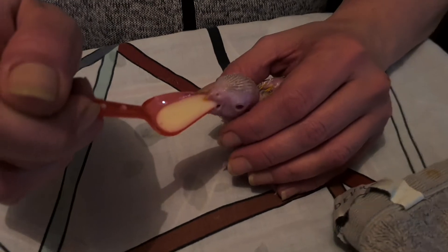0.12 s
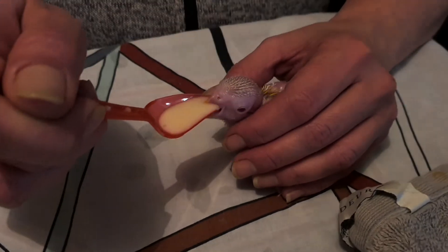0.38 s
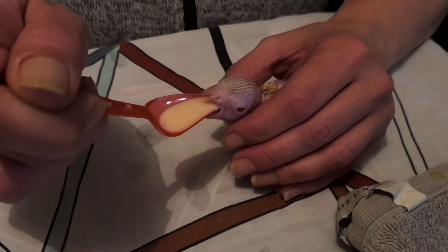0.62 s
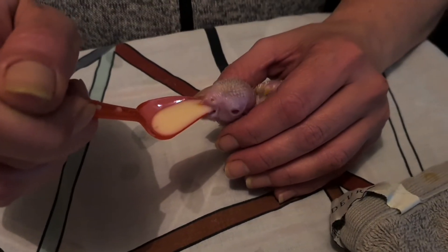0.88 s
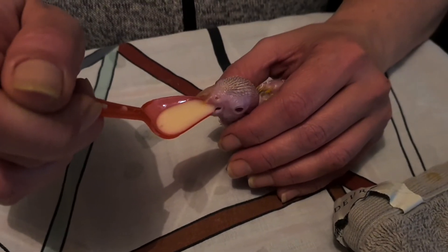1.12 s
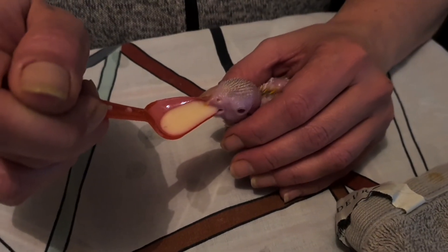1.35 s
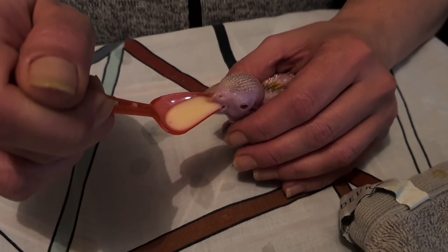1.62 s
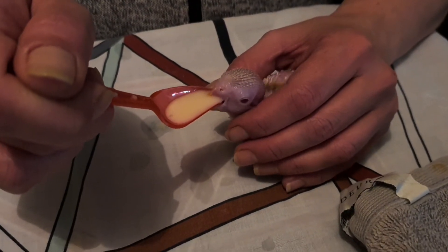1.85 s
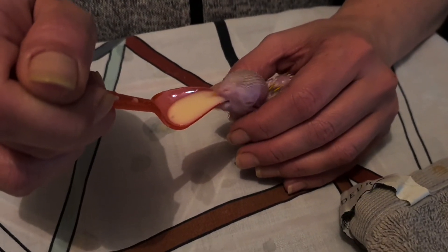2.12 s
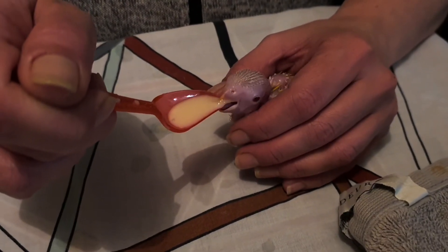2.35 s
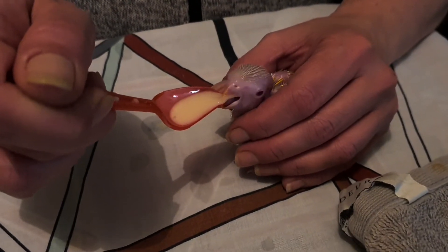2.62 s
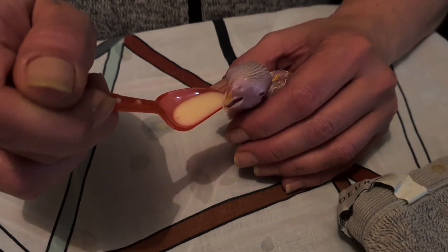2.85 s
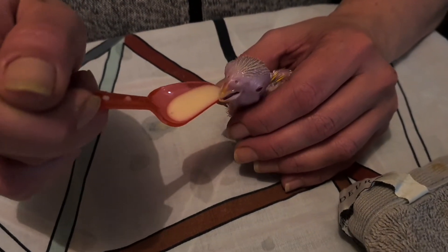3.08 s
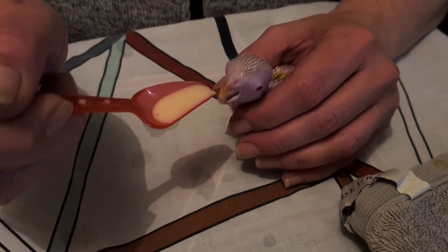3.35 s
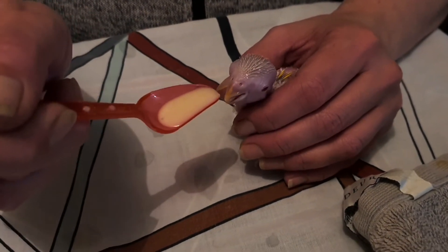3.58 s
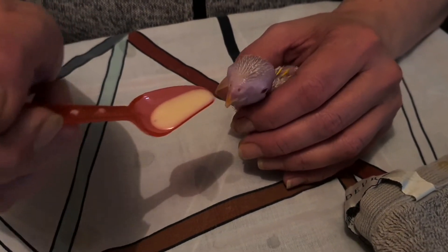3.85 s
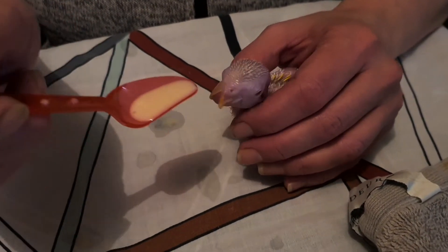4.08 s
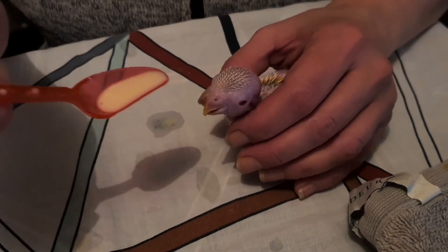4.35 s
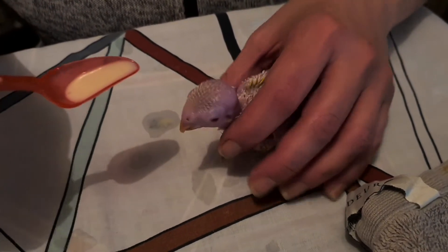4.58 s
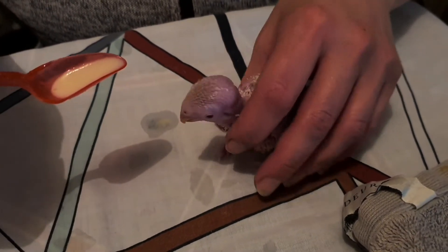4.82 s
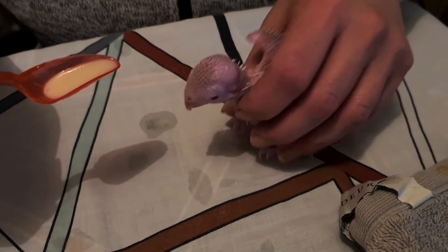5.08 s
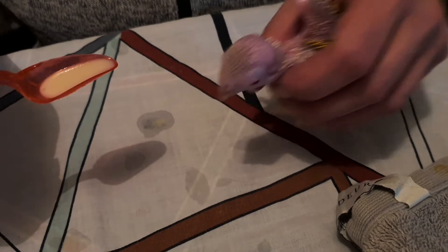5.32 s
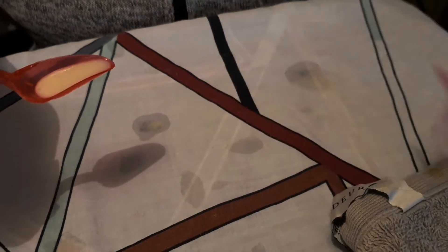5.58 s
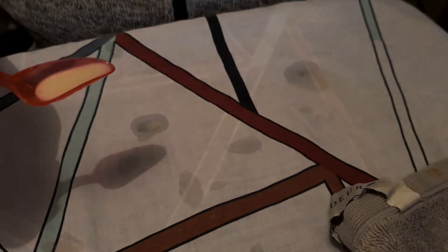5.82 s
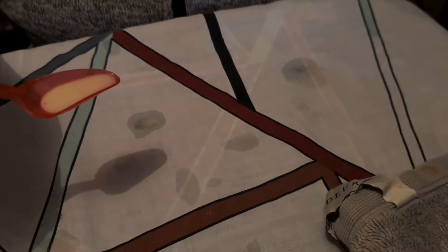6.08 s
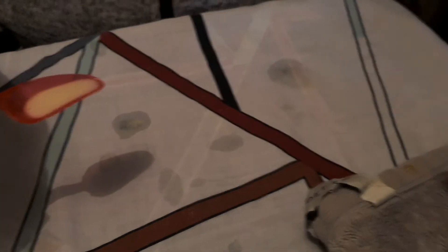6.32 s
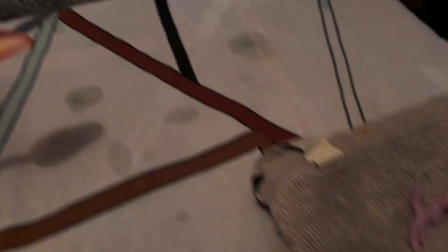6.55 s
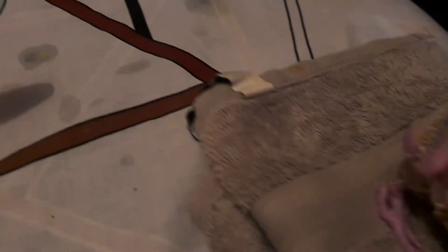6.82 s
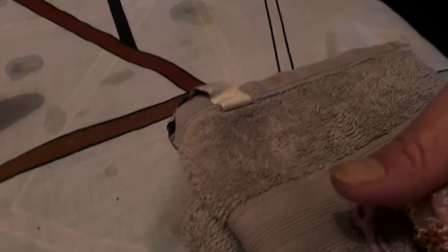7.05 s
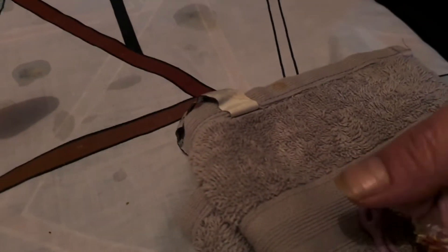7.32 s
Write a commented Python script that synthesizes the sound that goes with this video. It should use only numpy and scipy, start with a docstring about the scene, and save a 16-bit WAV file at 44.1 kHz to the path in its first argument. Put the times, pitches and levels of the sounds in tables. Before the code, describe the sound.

A close, dry stereo take in a quiet room with barely audible air noise, hum and hiss. From 0.2 to 1.9 seconds, rounded hollow table thumps come irregularly, several per second, over a patter of small bumps, grainy cloth brushes and tiny bright beak ticks on a spoon. Crisper ticks fall around 2.1. At 2.3 a parrot chick gives a short harsh squawk, moderately loud, fading with a tiny falling whistle. Light ticks and faint bumps follow, then strong thumps at 3.7, 3.8, 4.2 and 4.6. Louder raspy squawks, about 0.4 seconds each, start at 3.9, ending in a thin whistle, and at 4.75. A bright one at 5.5 droops sharply; a longer, rougher one runs 6.25 to 6.75, further right. Soft rustling and a tick precede the last sharp squawk at 7.3, which runs up to the end.

```python
"""Squawking parrot chick

A parrot chick squawks six times on a cloth-covered table in a quiet room, close to a pair of microphones.
Its voice is a half-chaotic membrane driving throat resonances that follow the beak. Its bobbing and the
feeding hands excite the damped modes of the hollow table; the beak on the spoon gives ringing cracks,
and brushed cloth gives grainy noise. Coloured air noise, a faint hum and hiss lie beneath."""
import sys
import numpy as np
from scipy import signal
from scipy.fft import rfft, irfft, next_fast_len
from scipy.io import wavfile
from scipy.ndimage import uniform_filter1d

SR = 44100
rng = np.random.default_rng(int(sys.argv[2]) if len(sys.argv) > 2 else 0)


def convert_level_to_amplitude(level_db):
    """Map a level in decibels to its linear amplitude factor."""
    exponent = np.asarray(level_db, float) / 20
    return 10 ** exponent


def inscribe(sig):
    """Save sig as 16-bit PCM at rate SR to the path in sys.argv[1].

    A 1-D sig is mono; a 2-D sig holds one channel per row.
    Samples are clipped to [-1, 1] before scaling.
    """
    pcm = np.round(np.clip(np.atleast_2d(sig).T, -1, 1) * 32767)
    wavfile.write(sys.argv[1], SR, pcm.astype(np.int16))


N = 327648  # length in samples

# Noise of the still air: [f/Hz, relative density level/dB per Hz]
AIR_SPECTRUM = [(15, -37.5), (25, -8.5), (102, -7.5), (127, -13), (190, -21.5), (270, -18.5), (326, -24),
                (476, -12), (714, -31), (887, -25.5), (1740, -22.5), (4870, -35.5), (16000, -48.5)]
# Likeness of the air noise at left and right: [f/Hz, correlation, clipped to -1..1]
AIR_LIKENESS = [(60, -0.084), (640, 0.5), (1400, -1.3), (15000, 1)]
AIR_DB, SELF_NOISE_DB = -69.5, -83.5  # rms of the air noise and of the microphones' own hiss
HUM_HZ, HUM_DB = 101, -73.5  # level of the peak

# Thumps on the table: [t/s, peak level of the ring/dB, gain of modes below 160 Hz/dB,
# peak level of the slap relative to the ring/dB]
THUMPS = [(0.153, -49, -25, -13), (0.208, -29, -23, -21), (0.453, -25, -20, -16.5), (0.792, -22, -19, -28),
          (0.91, -48, -16, -8), (1.071, -20.5, -20.5, -20.5), (1.213, -20.5, -21.5, -22),
          (1.339, -20, -20, -37), (1.469, -43.5, -28, -26), (1.536, -23.5, -21, -25.5),
          (1.74, -32.5, -15, -33), (1.902, -24, -13.5, -28.5), (2.471, -43, -20, -3),
          (2.509, -38.5, -23, -7), (2.983, -53, -10, -26), (3.022, -41, -23, -11.5),
          (3.223, -51.5, -35, -23), (3.447, -55.5, -36, -9), (3.603, -47, -23, -16),
          (3.655, -17, -22.5, -17.5), (3.839, -17, -18.5, -21), (4.223, -17.5, -23, -26.5),
          (4.558, -15.5, -24.5, -29), (6.933, -49, -18, -27.5), (7.258, -45, -19.5, -23.5)]
# Modes of the hollow table: [f/Hz, relative level/dB, t60/s]
TABLE_MODES = [(56.5, 7.5, 0.23), (159.09, 6, 0.12), (240, -4.5, 0.07), (276.5, 0.5, 0.11),
               (333.6, -1.5, 0.085), (436, -7.5, 0.097), (507, -16, 0.11), (635, -21.5, 0.13)]
# Envelope of the small bumps of hands on the table: [t/s, level/dB]
JOSTLE = [(0.0, -100), (0.14, -67), (0.33, -57.5), (0.72, -58.5), (1.71, -58), (2.23, -66.5), (2.5, -60.5),
          (2.69, -66), (3.02, -75.5), (3.2, -61.5), (3.4, -78.5), (3.62, -66.5), (3.79, -50), (3.95, -68),
          (4.88, -64), (5.2, -84.5), (6.21, -90), (7.06, -81.5), (7.43, -69)]

# Skin and down brushing the cloth: [centre t/s, level before graining/dB, half length to 1/e of peak/s]
RUSTLES = [(0.187, -75, 0.12), (0.41, -70, 0.041), (0.749, -64.5, 0.015), (.92, -60.5, 0.014),
           (1.201, -65, 0.017), (1.37, -73, 0.058), (1.475, -68.5, 0.016), (1.577, -70, 0.029),
           (1.636, -62, 0.012), (1.686, -60.5, 0.0055), (1.776, -67.5, 0.027), (2.085, -70, 0.0014),
           (3.034, -64, 0.023), (3.242, -80, 0.016), (3.66, -79.5, 0.09), (3.793, -60, 0.015),
           (6.06, -65, 0.005), (6.081, -64.5, 0.0056), (6.897, -65, 0.14), (7.311, -60, 0.025)]
# Noise of the cloth: [f/Hz, relative density level/dB per Hz]
CLOTH_SPECTRUM = [(500, 1.5), (1000, 0), (2200, -1.5), (3500, -11.5), (7000, -10), (9500, -19.5),
                  (13000, -10), (16000, -18)]

# Beak on the spoon: [t/s, peak level/dB, centre f/Hz]
TICKS = [(0.6823, -46.5, 6560), (0.7158, -53, 5030), (0.831, -44.5, 7000), (1.1137, -46, 6570),
         (1.4034, -48.5, 4700), (1.5064, -49, 6150), (1.648, -41, 4970), (1.7848, -48, 4520),
         (1.833, -52, 4570), (1.881, -48, 5670), (2.0849, -38.5, 6900), (2.155, -54, 5860),
         (2.2064, -40.5, 6300), (3.021, -40, 6500), (3.289, -54, 5880), (3.4394, -57.5, 5750),
         (3.5192, -45.5, 7550), (3.7814, -61.5, 5440), (4.4624, -45, 8080), (5.2823, -47, 5630),
         (6.926, -65, 7120), (7.1761, -47.5, 7110)]

# Course of each squawk: [start t/s, length/s, burst level/dB, held level/dB, drift/dB per s, settling/s]
SQUAWKS = [(2.336, .266, -28, -37.5, -42.5, 0.035), (3.915, .43, -18, -35.5, -29.5, .03),
           (4.753, 0.43, -20.5, -37, 5, .03), (5.519, 0.31, -15.5, -27, -21, .035),
           (6.25, 0.51, -17.5, -29.5, -2, .045), (7.312, .2, -13.5, -28.5, 0, 0.032)]
# Pitch of each squawk: [first f/Hz, held f/Hz, last f/Hz, held roughness 0-1, last roughness 0-1]
VOICES = [(1277, 1470, 1720, .6, .3), (940, 1610, 1570, .7, 0.65), (1173, 1750, 1690, .55, .5),
          (1410, 1780, 1730, 0.55, 0.43), (951.3, 1740, 1630, 0.74, 0.79), (1471, 1690, 1650, .7, .6)]
# Colour of each squawk: [low-voice level/dB, the same in the burst/dB, brightness/dB per octave,
# droop of the pitch at the end/Hz, dark band f/Hz]
COLOURS = [(1.5, -12.5, -1, 10, 4000), (-4.5, -15, -3, 10, 4350), (1, -6, 6, 430, 4330),
           (0, -2, 5.5, 700, 2600), (-1.5, -13.5, 6, 100, 2720), (-2, -9.5, 3, 10, 2700)]
# Lower edge of what the throat passes in each squawk: [f/Hz]
THROAT_FLOORS_HZ = [750, 800, 748, 1190, 720, 740]
# Place of each squawk: [lag of left behind right/ms, left minus right level/dB, beak-opening factor]
PLACES = [(-.11, 5, 0.918), (-0.12, 5, 1.01), (-.135, 4.5, 1.01), (0.19, 2, 1.1), (0.176, -3, 1.01),
          (.11, -3, 1.2)]
# Resonances of throat and beak before the beak moves them: [f/Hz, width of the first stage/Hz, level/dB]
THROAT = [(1620, 1400, -22), (3560, 2020, 1), (5880, 1500, 8), (7170, 710, 2.5), (9600, 1100, -4),
          (11574, 2800, -16)]
# Breaks into a clear falling whistle: [t/s, length/s, from f/Hz, to f/Hz, starting level/dB,
# lateness of the fall (exponent)]
WHISTLES = [(2.573, 0.023, 2980, 2497, -44.5, .8), (4.245, 0.033, 3100, 2890, -48.5, .3),
            (4.279, .064, 5150, 2200, -53.5, 4)]
WHISTLE_ROUGH, WHISTLE_LOW_DB, WHISTLE_BRIGHT_DB = .08, 9, -1  # the last in dB per octave
WHISTLE_SWELL_DB = 4.5  # a whistle grows as it falls
# Pitch climbs to a top, sinks and drifts, and droops at the end
TOP_HZ, CLIMB_S, SETTLE_S, DROOP_S = 1952, .023, .035, 0.038
# Roughness rises during the climb, rises on to its held value, then drifts
FIRST_ROUGH, CLIMBED_ROUGH = .2, .42
# Loudness snaps in and swells to the burst
ATTACK_S, SWELL_S, SWELL_DB, BURST_S = .008, .014, -8, 0.025
FADE_S, FADE_DB, RELEASE_S, QUIET_DB = 0.092, -7, 0.006, -24
FIRST_LOW_DB, LAST_LOW_DB, FIRST_BRIGHT_DB = 5, 6, -10  # dull start and end; the last in dB per octave
DARK_WIDTH_HZ, DARK_DEPTH = 300, 0.71  # depth is the fraction of the band taken away
BEAK_WOBBLE, BEAK_SHUT = 0.018, 0.63  # the beak drifts a little and closes as the pitch droops

# Decay of the room: [f/Hz, t60/s]
ROOM_DECAY = [(250, .2), (2000, 0.17), (6000, 0.15), (14000, 0.064)]


def evened(x):
    """Normalisation: scales to rms 1."""
    return x / np.sqrt(np.mean(x ** 2) + 1e-20)


def read(points, hz):
    """Interpolation: reads a curve on a log-frequency axis."""
    f, value = np.transpose(points)
    return np.interp(np.log(hz + 1), np.log(f + 1), value)


def add(mix, s, sound):
    """Superposition: mixes a sound in at time s."""
    part = mix[..., round(s * SR):][..., :sound.shape[-1]]
    part += sound[..., :part.shape[-1]]


def resonate(x, hz, width):
    """Heterodyning: shifts the curve hz to zero, smooths, and shifts back, a resonance of gain 1."""
    turn = np.exp(2j * np.pi * np.cumsum(hz * np.ones(len(x))) / SR)
    r = np.exp(-np.pi * width / SR)
    return 2 * (turn * signal.lfilter([1 - r], [1, -r], x / turn)).real


def placed(x, lag_ms, pan_db):
    """Two-microphone localisation: one source arrives at slightly different times and levels."""
    size = next_fast_len(len(x) + 64)
    side = np.array([[.5], [-.5]])  # left and right share each difference equally
    shift = np.exp(-2j * np.pi * np.fft.rfftfreq(size, 1 / SR) * side * lag_ms / 1000)
    return convert_level_to_amplitude(side * pan_db) * irfft(rfft(x, size) * shift, size)[:, :len(x)]


def hiss(colour, same, patchy_db):
    """Partly coherent noise: two channels with a spectrum, a likeness and drifting patches."""
    frames, hz = N // 256 + 5, np.fft.rfftfreq(1024, 1 / SR)
    a, b, c, d, patches = rng.standard_normal((frames, 513, 5)).T
    patches = uniform_filter1d(patches, size=14, axis=0)
    patches = evened(uniform_filter1d(patches, size=10, axis=1))
    same = np.clip(read(same, hz), -1, 1)[:, None]
    left = a + 1j * b
    right = same * left + np.sqrt(1 - same ** 2) * (c + 1j * d)
    z = np.array([left, right]) * convert_level_to_amplitude(read(colour, hz)[:, None] + patchy_db * patches)
    return evened(signal.istft(z, nperseg=1024, noverlap=768)[1][:, :N])


def hum():
    """Pure tone: a faint steady sine."""
    return convert_level_to_amplitude(HUM_DB) * np.sin(2 * np.pi * HUM_HZ * np.arange(N) / SR)


def self_noise():
    """Independent noise: each microphone hisses by itself in a broad treble band."""
    own = [evened(resonate(air, 12800, 3000)) for air in rng.standard_normal((N, 2)).T]
    return convert_level_to_amplitude(SELF_NOISE_DB) * np.array(own)


def knock(boom_db, slap_db, push_s, luck, air):
    """Modal excitation: a soft push rings the table; a dull slap follows a few ms later."""
    t = np.arange(len(air)) / SR
    ring = 0
    for (hz, db, t60), u in zip(TABLE_MODES, luck):
        mode_db = db + (hz < 160) * boom_db + u - 60 * t / t60
        ring = ring - convert_level_to_amplitude(mode_db) * np.sin(2 * np.pi * hz * t + 0.45 * u)
    soft_start = 1 - np.exp(-(t / push_s) ** 2)
    ring = ring * soft_start * (1 + 2.5 * np.exp(-(t / .010) ** 2))
    late = np.maximum(t - .005, 0)
    burst = (late > 0) * (np.exp(-late / .004) + .55 * np.exp(-late / .02)) * air
    slap = resonate(burst, 860, 400) + .8 * resonate(burst, 1260, 450) + .35 * resonate(burst, 2110, 900)
    slap = signal.sosfilt(signal.butter(3, [600, 2900], "band", fs=SR, output="sos"), slap)
    return ring / abs(ring).max() + convert_level_to_amplitude(slap_db) * slap / abs(slap).max()


def table():
    """Linear superposition: listed thumps over a random patter of bumps; the deepest boom leans left."""
    out = np.zeros(N)
    luck = rng.standard_normal((len(THUMPS) + 4, len(TABLE_MODES) + 12000))
    for (s, db, boom_db, slap_db), row in zip(THUMPS, luck):
        add(out, s + .001, convert_level_to_amplitude(db) * knock(boom_db, slap_db, .0035, row, row[len(TABLE_MODES):]))
    heights = convert_level_to_amplitude(3.8 * np.minimum(rng.exponential(1, N), 4))
    happens = rng.random(N) < 130 / SR  # 130 bumps per second on average
    bumps = heights * happens * rng.choice([-1, 1], N)
    kind = rng.integers(0, 4, N)  # four different knocks take turns at random
    patter = 0
    for k, row in enumerate(luck[-4:]):
        bump = knock(-14.5, -14, 0.0073, 2 * row, row[len(TABLE_MODES):])
        patter = patter + signal.oaconvolve(bumps * (kind == k), bump)[:N]
    out += convert_level_to_amplitude(np.interp(np.arange(N) / SR, *np.transpose(JOSTLE))) * evened(patter)
    boom = signal.sosfilt(signal.butter(2, 90, fs=SR, output="sos"), out)
    near_left = placed(out, -0.11, 1.8)
    return near_left + .3 * np.array([boom, -boom])


def cloth():
    """Friction noise: short brushes whose level flickers in fine grains."""
    t = np.arange(N) / SR
    stroke = sum(convert_level_to_amplitude(db) * np.exp(-((t - s) / half) ** 2) for s, db, half in RUSTLES)
    grain = convert_level_to_amplitude(4 * evened(uniform_filter1d(rng.standard_normal(N), size=90)))
    return stroke * grain * hiss(CLOTH_SPECTRUM, [(500, 0.83), (3000, 0.44)], 2.3)


def ticks():
    """Impact: each tick is a crack with a very short ring and a puff of tail."""
    out, t = np.zeros(N), np.arange(900) / SR
    for (s, db, hz), air in zip(TICKS, rng.standard_normal((len(TICKS), 900))):
        crack = air * (np.exp(-t / .0004) + .06 * np.exp(-t / .004))
        tick = resonate(crack, hz, 1800) + 1.7 * resonate(crack, 2300, 800) + 0.29 * crack
        add(out, s, convert_level_to_amplitude(db) * tick / abs(tick).max())
    return placed(out, -0.12, 0.98)


def gesture(start, length, burst_db, held_db, drift_db, settle_s, first_hz, held_hz, last_hz, held_rough,
            last_rough, low_db, burst_low_db, bright_db, droop_hz):
    """Control of phonation: effort, pitch, roughness and colour over one squawk."""
    t = np.arange(0, length, 1 / SR)
    left = length - t
    snap, ending = np.exp(-t / SWELL_S), np.clip(1 - left / FADE_S, 0, 1)
    burst = np.exp(-(np.maximum(t - BURST_S, 0) / settle_s) ** 2.1)
    effort_db = held_db + drift_db * t + (burst_db - held_db) * burst
    effort_db = effort_db + SWELL_DB * snap + FADE_DB * ending
    climb = np.minimum(t / CLIMB_S, 1)
    settled = 1 - np.exp(-np.maximum(t - CLIMB_S, 0) / SETTLE_S)
    drifting_hz = held_hz + (last_hz - held_hz) * t / length
    hz = first_hz + (TOP_HZ - first_hz) * np.sin(climb * np.pi / 2) + (drifting_hz - TOP_HZ) * settled
    shut = droop_hz / last_hz * np.clip(1 - left / DROOP_S, 0, 1) ** 2.2
    hz = hz * (1 - shut)
    drifting_rough = held_rough + (last_rough - held_rough) * t / length
    rough = FIRST_ROUGH + (CLIMBED_ROUGH - FIRST_ROUGH) * climb
    rough = rough + (drifting_rough - CLIMBED_ROUGH) * settled
    low_db = low_db + (burst_low_db - low_db) * burst * climb
    low_db = low_db + FIRST_LOW_DB * snap + LAST_LOW_DB * ending
    bright_db = bright_db + FIRST_BRIGHT_DB * snap
    for s, span, from_hz, to_hz, db, late in WHISTLES:
        u = (start + t - s) / span
        on = (u >= 0) & (u < 1)
        hz = np.where(on, from_hz + (to_hz - from_hz) * abs(u) ** late, hz)
        rough = np.where(on, WHISTLE_ROUGH, rough)
        effort_db = np.where(on, db + WHISTLE_SWELL_DB * u, effort_db)
        low_db = np.where(on, WHISTLE_LOW_DB, low_db)
        bright_db = np.where(on, WHISTLE_BRIGHT_DB, bright_db)
    edges = np.clip(1 - t / ATTACK_S, 0, 1) ** .7 + np.clip(1 - left / RELEASE_S, 0, 1) ** 2
    effort_db = uniform_filter1d(effort_db, size=90) + QUIET_DB * edges
    return t, effort_db, low_db, bright_db, hz, np.clip(rough, 0, 1), shut


def membrane_drive(hz, rough):
    """Nonlinear oscillation: a membrane wanders between a whistle and chaos, with puffs of air."""
    wander, shimmer, slip, air = rng.standard_normal((len(hz), 4)).T
    wander = evened(uniform_filter1d(wander, size=150))
    turns = np.cumsum(hz * (1 + .058 * rough * wander)) / SR
    shimmer = np.exp(.42 * rough * evened(uniform_filter1d(shimmer, size=130)))
    # strong and weak half cycles swap at random, which blurs the odd partials
    slip = 1 - rough + 1.42 * rough * evened(uniform_filter1d(slip, size=80))
    fall = 0.4 + 0.95 * rough * (1 - rough)  # whistles are pure, and chaos swallows the upper partials
    membrane = 0
    for k in range(1, 12):
        weight = slip if k % 2 else 1 + 0.1 * rough * (k == 2)
        audible = k * hz < SR / 2.4  # partials stay below the Nyquist limit
        membrane = membrane + np.cos(2 * np.pi * k * turns) * weight * audible * fall ** (k - 1)
    puffs = (.6 + np.exp(-(turns / 2 % 1) / 0.45)) * air  # air bursts on every second cycle
    return shimmer * (np.sqrt(1 - rough ** 2) * membrane + rough ** 1.5 * 2.2 * evened(puffs))


def squawk(t, effort_db, low_db, bright_db, hz, rough, shut, opening, dark_hz, bottom_hz):
    """Source and filter: the membrane drives throat resonances that follow the beak."""
    beak = opening * (1 + 0.003 * (effort_db - np.median(effort_db)))  # opens wider on the loud start
    drift = uniform_filter1d(rng.standard_normal(len(t)), size=2000)
    drift = evened(uniform_filter1d(drift, size=1000))
    beak = beak * (1 + BEAK_WOBBLE * drift - BEAK_SHUT * shut)
    drive = membrane_drive(hz, rough)
    voice = convert_level_to_amplitude(-19.0) * resonate(drive, 3700, 9900)  # leak between the resonances
    for k, (f, width, db) in enumerate(THROAT):
        # the lowest one leans towards the pitch
        centre_hz = f * beak if k else np.sqrt(f * np.minimum(hz, 2100))
        once = resonate(drive, centre_hz, width)
        weight_db = db + bright_db * max(np.log2(f / 3500), 0)
        voice = voice + convert_level_to_amplitude(weight_db) * resonate(once, centre_hz, width * 3.6)
    voice = signal.sosfilt(signal.butter(4, [bottom_hz, 14000], "band", fs=SR, output="sos"), voice)
    voice = voice - DARK_DEPTH * resonate(voice, dark_hz, DARK_WIDTH_HZ)
    low = signal.sosfiltfilt(signal.butter(3, 2450, fs=SR, output="sos"), voice)
    voice = voice + (convert_level_to_amplitude(low_db) - 1) * low
    steady = voice / np.sqrt(uniform_filter1d(voice ** 2, size=900) + 1e-12)
    return convert_level_to_amplitude(effort_db) * steady


def squawks():
    """Sequence of calls: each squawk has its own gesture, colour and place."""
    chick = np.zeros((2, N))
    rows = zip(SQUAWKS, VOICES, COLOURS, THROAT_FLOORS_HZ, PLACES)
    for course, pitch, (*colour, dark_hz), bottom_hz, (lag_ms, pan_db, opening) in rows:
        voice = squawk(*gesture(*course, *pitch, *colour), opening, dark_hz, bottom_hz)
        add(chick, course[0], placed(voice, lag_ms, pan_db))
    return chick


def scatter(x):
    """Early reflection: hands and table top return a few ms of echoes, different at each microphone."""
    t = np.arange(700) / SR
    taps = rng.standard_normal((2, 700)) * np.exp(-t / .005) * (t > .001)
    taps = np.diff(taps, prepend=0)  # small things scatter the treble most
    return signal.fftconvolve(x, taps / np.linalg.norm(taps, axis=1, keepdims=True), axes=1)[:, :N]


def room(x):
    """Reverberant decay: sparse taps of random sign, each band dying at its own speed."""
    taps = np.zeros((2, SR // 2))
    slots = np.arange(160, SR // 2 - 20, 20)
    at = slots + rng.integers(0, 20, (2, len(slots)))
    np.put_along_axis(taps, at, rng.choice([-1., 1.], at.shape), 1)
    hz, t, z = signal.stft(taps, SR, nperseg=256)
    decay = convert_level_to_amplitude(-60 * t / read(ROOM_DECAY, hz)[:, None])
    tail = signal.istft(z * decay, SR, nperseg=256)[1]
    return signal.fftconvolve(x, tail / np.linalg.norm(tail[0]), axes=1)[:, :N]


def scene():
    """Superposition: chick, table, spoon and cloth in a still room with a faint hum."""
    background = convert_level_to_amplitude(AIR_DB) * hiss(AIR_SPECTRUM, AIR_LIKENESS, 1.7) + hum() + self_noise()
    thumps = table()
    near = cloth() + ticks()
    chick = squawks()
    voice = chick + convert_level_to_amplitude(-0.5) * scatter(chick) + convert_level_to_amplitude(-11.0) * room(chick)
    return background + thumps + near + convert_level_to_amplitude(-6.5) * room(near) + voice


def top_cut(x):
    """Nothing passes above the cut-off."""
    return signal.sosfilt(signal.butter(12, 16470, fs=SR, output="sos"), x)


def record(dry):
    """Transduction: the microphones round off the highest peaks and lose the deepest bass."""
    rounded = np.tanh(dry)
    mix = signal.sosfilt(signal.butter(2, 42, "high", fs=SR, output="sos"), rounded)
    return top_cut(mix)


dry = scene()
out = record(dry)
inscribe(out)
```